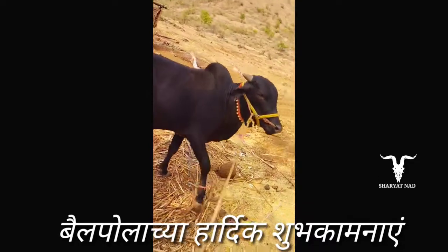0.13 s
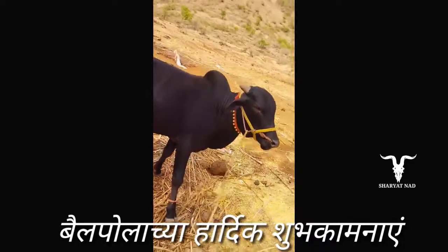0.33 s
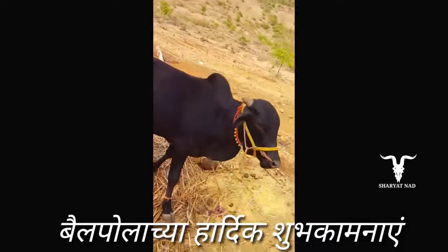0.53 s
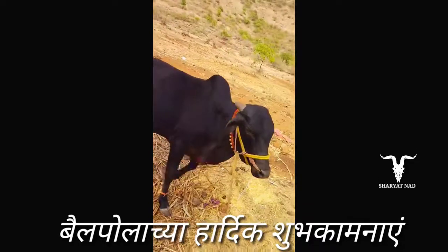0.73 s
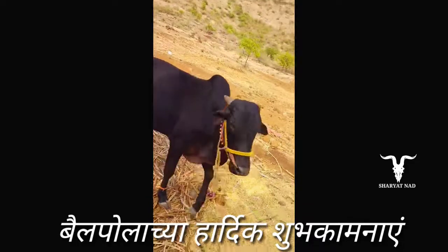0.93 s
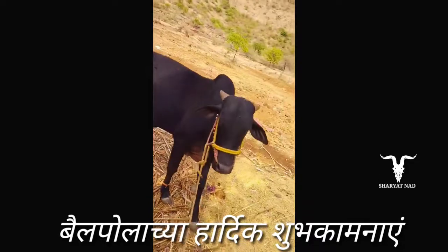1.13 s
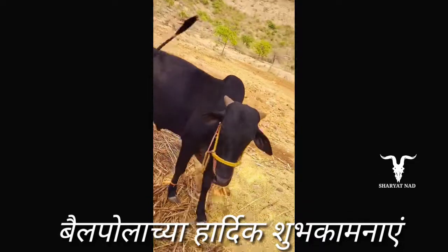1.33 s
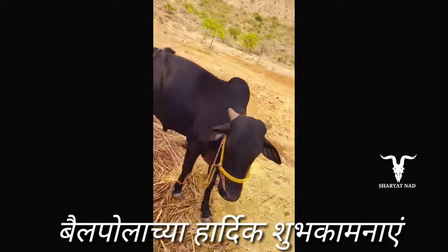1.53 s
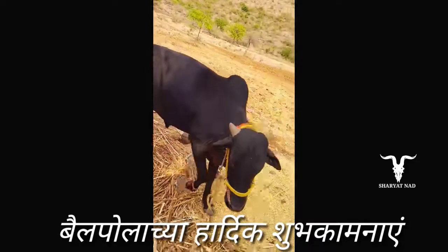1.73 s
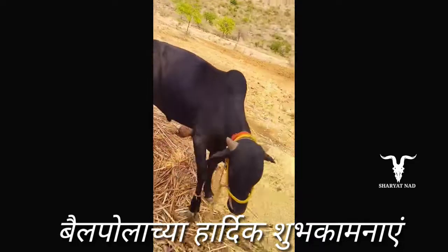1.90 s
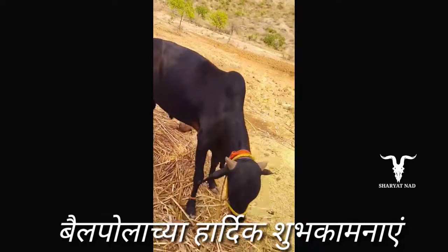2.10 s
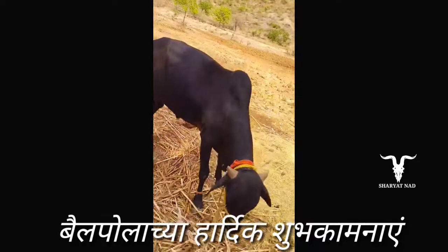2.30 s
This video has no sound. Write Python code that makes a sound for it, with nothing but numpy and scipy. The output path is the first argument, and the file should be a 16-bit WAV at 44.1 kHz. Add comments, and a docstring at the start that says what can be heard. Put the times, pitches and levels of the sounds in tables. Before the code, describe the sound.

Dry straw rustles, crunches and crackles close up as a bullock shifts its hooves outdoors, with sharp stalk snaps and faint gritty scuffs, while low wind puffs buffet the stereo microphone, mostly on the right.

```python
"""Bullock in dry straw, close by

A young bullock shifts its feet outdoors: stalks slide, crunch and crackle as shaped noise and tiny rings,
a few snap as short bursts with a ring, and hooves scuff the dry ground as swells of gritty noise.
A breeze buffets the two microphone ports, mostly the right, with soft low puffs made of random pushes
and single strong eddies; faint steady noise is the air of the yard."""
import sys
import numpy as np
from scipy import signal
from scipy.fft import rfft, irfft, next_fast_len
from scipy.io import wavfile
from scipy.ndimage import uniform_filter1d, map_coordinates

SR = 44100
rng = np.random.default_rng(int(sys.argv[2]) if len(sys.argv) > 2 else 0)


def transcribe(u):
    """Save the signal u as a 16-bit wav file named by the first command-line argument.

    u: samples, shape (n,) or (channels, n), limited to [-1, 1]; the rate is SR.
    q: integer samples, one column per channel.
    """
    v = np.clip(np.atleast_2d(u).T, -1, 1)
    q = np.round(v * 32767).astype(np.int16)
    wavfile.write(sys.argv[1], SR, q)


N = 108221


def amp(db):
    """Decibels to gain."""
    return 10 ** (np.asarray(db) / 20)


def unit(x):
    """Scale to rms 1, all channels together."""
    return x / np.sqrt(np.mean(x ** 2) + 1e-20)


def along(points, hz):
    """Read (Hz, value) points at any frequency, on a log axis."""
    f, v = np.transpose(points)
    return np.interp(np.log(hz + 1), np.log(f + 1), v)


def curves(rows):
    """One value per sample for each column after the time."""
    s, *cols = np.transpose(rows)
    return [np.interp(np.arange(N) / SR, s, c) for c in cols]


def wobble(rate):
    """A bounded random curve of straight lines between knots, rate knots a second."""
    knots = np.clip(rng.standard_normal(N // 20), -1.6, 1.6)
    return 1.26 * np.interp(np.arange(N) * rate / SR, np.arange(N // 20), knots)


def filtered(x, response):
    """Multiply the spectrum of x by a response of frequency."""
    m = next_fast_len(N + SR // 4)
    return irfft(rfft(x, m) * response(np.fft.rfftfreq(m, 1 / SR)), m)[..., :N]


def coloured(x, spectrum):
    """Shape x by the given spectrum and bring it to rms 1."""
    return unit(filtered(x, lambda hz: amp(along(spectrum, hz))))


def steadied(x, window_s):
    """Even out the level towards rms 1 over every short stretch."""
    power = uniform_filter1d(x ** 2, max(int(window_s * SR), 1))
    return x / np.sqrt(np.abs(power) + 0.034)


def add(track, s, sound):
    """Mix a sound into the track at time s in seconds."""
    part = track[..., max(round(s * SR), 0):][..., :sound.shape[-1]]
    part += sound[..., :part.shape[-1]]


def port_gains(pan_db):
    """Left and right gains of total power 1."""
    g = amp(np.array([pan_db / 2, -pan_db / 2]))
    return g / np.sqrt(np.sum(g ** 2, axis=0))


def impulses(rate, spread_db):
    """Randomly timed pushes of either sign and uneven size."""
    struck = rng.random(N) < rate / SR
    sign = rng.choice([-1, 1], N)
    return struck * sign * amp(spread_db * np.clip(rng.standard_normal(N), -2, 2))


def at_ports(pair):
    """Two unrelated versions of a straw or hoof sound become partly alike left and right signals."""
    # Each row: frequency in Hz, left minus right in dB
    lean = [(900, 1), (1800, 3), (3000, -0.5), (4200, 0.5), (6600, 5.5), (9000, -3.5), (12000, 1),
            (15000, 4.5)]
    # Each row: frequency in Hz, phase by which the left leads in radians
    port_phase = [(600, 4.5), (1200, -0.83), (1700, -0.6), (2600, -0.9), (3100, -5), (3800, -3.5),
                  (5200, -2.5), (6500, -4), (9000, -5.5), (15000, -4.5)]
    # Each row: frequency in Hz, left-right likeness (correlation)
    alike = [(800, 0.16), (5000, 0.27), (8000, 0.37), (15000, 0.3)]

    def mix(hz):
        turn = np.arccos(np.clip(along(alike, hz), -1, 1)) / 2
        return np.array([np.cos(turn), np.sin(turn)])

    half = np.array([[.5], [-.5]])  # each port takes half of the difference

    def place(hz):
        return amp(half * along(lean, hz)) * np.exp(1j * half * along(port_phase, hz))

    mid, side = filtered(pair, mix)
    return filtered(np.array([mid + side, mid - side]), place)


def patchy(x, depth_db, patch_hz=170, patch_s=.035):
    """Different stalks sound in turn, so the colour shifts in small patches of pitch and time."""
    z = signal.stft(x, nperseg=1024)[2]
    bins_hz, frames_s = np.linspace(0, SR / 2, z.shape[1]), np.linspace(0, N / SR, z.shape[2])
    hz, s = np.meshgrid(bins_hz, frames_s, indexing="ij")
    knots = rng.standard_normal((256, 256))
    field = map_coordinates(knots, [hz / patch_hz, s / patch_s], order=1, mode="wrap")
    return signal.istft(z * amp(depth_db * field), nperseg=1024)[1][:, :N]


def yard(level_db=-63):
    """The faint air of the open yard: steady noise, unrelated at the two ports."""
    air_tone = [(30, 1), (150, 7), (700, -55.0), (2000, -5.0), (15000, -9)]  # (Hz, relative dB)
    return amp(level_db) * coloured(rng.standard_normal((2, N)), air_tone)


def buffeting(level_db=-1.21, smooth_db=-6, flutter_db=3.0, edge_db=-9, edge_grows=0.54, brisk_db=-32):
    """Small eddies strike each port separately; the sound brightens when fast air covers both ports."""
    # Strength of the breeze at each port. Each row: time in seconds, level in dB before level_db
    breeze_left = [(0.0, -61), (0.2, -71), (0.36, -61), (0.41, -34.5), (0.5, -44), (0.65, -44),
                   (0.79, -38.5), (0.94, -50.5), (1.19, -39.5), (1.23, -48), (1.34, -27), (1.47, -33.5),
                   (1.55, -36), (1.62, -29), (1.72, -38.5), (1.79, -28.5), (1.86, -38.5), (1.96, -30.5),
                   (2.02, -33.5), (2.12, -35.5), (2.2, -30.5), (2.28, -30), (2.36, -37.5), (2.45, -28)]
    breeze_right = [(0.0, -25.5), (0.07, -33), (0.18, -43), (0.29, -37), (0.35, -29.5), (0.49, -26.5),
                    (0.59, -36), (0.68, -28.5), (0.81, -30), (0.92, -42), (0.97, -33), (1.13, -35.5),
                    (1.21, -38), (1.29, -32), (1.32, -28), (1.41, -25.5), (1.5, -31.5), (1.55, -26),
                    (1.62, -34.5), (1.7, -25), (1.81, -35), (1.882, -21.5), (1.96, -31), (2.07, -33.5),
                    (2.15, -25.5), (2.21, -39.5), (2.3, -32), (2.45, -30)]
    # Colour of the low puffs. Each row: frequency in Hz, relative level in dB per Hz
    puff_tone = [(20, -63), (40, -44), (60, -15), (95, 3.5), (150, 4), (240, 3.5), (340, -11.5), (450, -29),
                 (600, -35), (800, -84)]
    # Colour added by fast air. Each row: frequency in Hz, relative level in dB per Hz
    edge_tone = [(150, -28), (300, 2.5), (420, 0), (540, -8), (660, -16.5), (800, -23.5), (1100, -52)]
    eddies_per_s, edge_flicker_db = 330, 3.5
    levels = [curves(breeze)[0] for breeze in (breeze_left, breeze_right)]
    bright_db = edge_db + edge_grows * (np.mean(levels, axis=0) - brisk_db)
    ports = []
    for breeze_db in levels:
        push = unit(impulses(eddies_per_s, spread_db=1.1)) + amp(smooth_db) * rng.standard_normal(N)
        push = push * amp(flutter_db * wobble(60))
        edge = amp(bright_db + edge_flicker_db * wobble(70)) * coloured(push, edge_tone)
        puffs = steadied(coloured(push, puff_tone), window_s=0.0438)
        ports.append(amp(breeze_db + level_db) * (puffs + edge))
    return np.array(ports)


def eddies(level_db=-3.1, width_cycles=0.53):
    """A strong eddy at the ports is one soft push and pull of about a cycle."""
    # Each row: centre in seconds, level in dB before level_db, pitch in Hz, left minus right in dB
    strong_eddies = [(0.032, -16.5, 184, -23), (0.06, -14.5, 180, -28), (0.227, -21.5, 270, -28),
                     (0.326, -16.5, 290, -29), (0.372, -20, 270, -27), (0.392, -19.5, 328, -28),
                     (0.41, -20, 260, -22), (0.441, -14, 310, -27), (0.453, -17, 267, -24),
                     (0.479, -7, 284, -31), (0.485, -14, 348, -27), (0.491, -16.5, 230, -27),
                     (0.499, -13, 166, -18), (0.537, -14, 360, -30), (0.549, -12.5, 188, -22),
                     (0.554, -18.5, 174, -10), (0.722, -17.5, 253, -33), (0.774, -12.5, 330, -24),
                     (0.785, -21, 296, -15), (0.817, -14, 224, -23), (1.034, -16, 286, -17),
                     (1.095, -19.5, 230, -37), (1.153, -22, 273, -25), (1.243, -17, 352, -29),
                     (1.318, -9, 275, -23), (1.342, -18, 181, -12), (1.366, -29, 222, -7),
                     (1.398, -13, 270, -18), (1.411, -8, 350, -35), (1.424, -15.5, 231, -24),
                     (1.436, -12, 300, -31), (1.445, -16.5, 262, -23), (1.476, -11.5, 226, 5),
                     (1.564, -12.5, 300, -33), (1.666, -16.5, 323, -16), (1.679, -13.5, 262, -24),
                     (1.695, -19, 333, -26), (1.712, -14, 330, -17), (1.723, -12.5, 283, -15),
                     (1.733, -14.5, 318, -23), (1.841, -16, 218, -27), (1.887, -9.5, 316, -26),
                     (1.91, -13, 318, -25), (1.925, -18.5, 271, -23), (1.953, -11.5, 215, 21),
                     (2.011, -12, 337, -29), (2.083, -15.5, 186, -34), (2.148, -10.5, 268, -31),
                     (2.159, -16.5, 203, -28), (2.267, -15.5, 145, 15), (2.279, -15.5, 232, 9),
                     (2.423, -15.5, 240, 16)]
    out, t = np.zeros((2, N)), np.arange(SR // 20) / SR
    for s, db, hz, pan_db in strong_eddies:
        cycles = (t - t.mean()) * hz
        push = np.exp(-(cycles / width_cycles) ** 2) * np.sin(-2 * np.pi * cycles)
        add(out, s - t.mean(), amp(db + level_db) * port_gains(pan_db)[:, None] * push)
    return out


def scuffs():
    """A hoof drags over the ground: a dull swish that swells and fades, each at its own pitch."""
    # Each row: peak in seconds, spread (standard deviation) in seconds, level in dB, pitch in Hz
    hoof_scuffs = [(0.183, 0.081, -52.5, 1120), (0.928, 0.049, -51, 1110), (1.204, 0.0048, -47.5, 1190),
                   (1.713, 0.043, -52.5, 890), (1.938, 0.015, -45.5, 2100), (2.074, 0.015, -49, 895),
                   (2.137, 0.0057, -50, 950)]
    # Colour of a scuff. Each row: multiple of its pitch, relative level in dB per Hz
    scuff_tone = [(.4, -22), (.74, -6), (.92, 2.5), (1.17, 0.5), (1.4, -4), (1.73, -17), (2.5, -32),
                  (5, -40)]
    t, out = np.arange(N) / SR, np.zeros((2, N))
    grit = rng.standard_normal((2, N)) * amp(2.0 * wobble(300))
    for s, spread_s, db, hz in hoof_scuffs:
        swell = amp(db) * np.exp(-((t - s) / spread_s) ** 2 / 2)
        out += swell * coloured(grit, [(k * hz, level) for k, level in scuff_tone])
    return out


def crackle(per_s=700, middle_hz=5040, life_cycles=0.62):
    """Countless tiny stalk fractures, each a ring that dies within about a cycle."""
    t = np.arange(128) / SR
    when, pitch, size, *phases = rng.random((int(per_s * N / SR), 5)).T[:, :, None]
    cycles = t * middle_hz * 2 ** (2.6 * (pitch - .5))
    life = amp(-4 * np.log(size + 0.029)) * np.exp(-2 * cycles / life_cycles)
    where = ((when * N).astype(int) + np.arange(len(t))).ravel()
    ports = []
    for phase in phases:  # the same fractures at both ports, with unrelated phases
        rings = life * np.sin(2 * np.pi * (cycles + phase))
        ports.append(np.bincount(where, rings.ravel(), N)[:N])
    return unit(np.array(ports))


def ticks(rate=100, spread_db=4, tick_t60=0.0046):
    """Brittle stalks click at random times, each with a short dry burst of noise."""
    # Colour of brittle stalks. Each row: frequency in Hz, relative level in dB per Hz
    tick_tone = [(900, -4), (1800, 3), (3000, 1.5), (7000, 1.5), (10000, -6), (15500, -12)]
    t = np.arange(SR // 100) / SR
    out, count = np.zeros((2, N)), int(rate * N / SR)
    for place, size in rng.random((count, 2)):
        fade_db = -spread_db * np.log(size + 0.054) - 60 * t / tick_t60
        add(out, place * N / SR, amp(fade_db) * rng.standard_normal((2, len(t))))
    return coloured(out, tick_tone)


def rustle(hiss_db=-2.0, crunch_db=-1.3, crackle_db=-10.5, tick_db=-6, grain_db=0.5):
    """Stalks slide, crunch and crackle as the hooves drag through them."""
    # The moving straw. Each row: time in seconds, level of the sliding in dB, level of the crunch in dB,
    # both before the trims above
    straw = [(0.0, -56, -50.5), (0.06, -53.5, -56), (0.18, -41.5, -45), (0.29, -50, -53),
             (0.34, -56.5, -64), (0.38, -54.5, -60), (0.38, -46, -50), (0.43, -35, -48.5),
             (0.48, -47.5, -52), (0.595, -41, -47), (0.68, -48.5, -52.5), (0.77, -47, -52),
             (0.78, -52, -56.5), (0.89, -45.5, -50), (0.97, -48, -53), (1.08, -48.5, -50),
             (1.14, -52, -53.5), (1.28, -42.5, -50), (1.34, -50, -51.5), (1.41, -43, -46), (1.57, -54, -58),
             (1.61, -47, -57.5), (1.69, -48.5, -48.5), (1.71, -55.5, -58), (1.76, -47.5, -52),
             (1.84, -53.5, -54), (1.9, -64, -64), (1.94, -46.5, -51.5), (2.01, -60.5, -57.5),
             (2.07, -48, -45.5), (2.09, -50, -54), (2.14, -41, -44.5), (2.17, -48, -54.5),
             (2.26, -45.5, -47), (2.28, -49.5, -55), (2.38, -52, -53.5), (2.45, -60, -59.5)]
    # Colours of sliding and of pressed stalks. Each row: frequency in Hz, relative level in dB per Hz
    hiss_tone = [(1500, -42), (2600, -38), (3400, -1.5), (4500, -3), (6800, -3), (9000, -6), (11500, -11.5),
                 (15500, -17)]
    crunch_tone = [(300, -37), (700, -10), (1000, -3.5), (1400, -1), (1800, 0), (2300, 0.5), (2850, 1),
                   (3150, -6), (6000, -35)]
    slide_db, press_db = curves(straw)
    catch = patchy(rng.standard_normal((2, N)), depth_db=5.0) * amp(grain_db * wobble(600))
    crunch = amp(press_db + crunch_db) * coloured(catch * amp(1.2 * wobble(70)), crunch_tone)
    slide = patchy(rng.standard_normal((2, N)), depth_db=3.5, patch_hz=257.6)
    slide = slide * amp(grain_db * wobble(600) + 2.02 * wobble(70.71))
    hiss = coloured(slide, hiss_tone)
    sliding = amp(hiss_db) * hiss + amp(crackle_db) * crackle() + amp(tick_db) * ticks()
    return crunch + amp(slide_db) * sliding


def snaps(ring_db=-7.5, crack_db=1, crack_q=0.72, splinter_db=-25, splinter_t60=0.11, attack_s=.0001):
    """A stalk breaks: a noise crack around its own pitch, a very short ring, a faint splintering tail."""
    # Each row: start in seconds, level in dB before the trims above, pitch in Hz, t60 in seconds
    breaks = [(.1366, -33, 2030, 0.0081), (0.382, -37, 2250, 0.013), (0.4249, -25, 5380, 0.012),
              (0.445, -37, 5900, .007), (0.616, -36, 4500, 0.0075), (0.7668, -32.5, 6780, 0.013),
              (0.8218, -13.5, 2440, 0.0044), (0.9287, -18.5, 1400, 0.0058), (0.9294, -21.5, 2780, 0.014),
              (0.936, -29, 2960, 0.0082), (1, -34, 4430, 0.0067), (1.0368, -24, 7250, 0.0053),
              (1.2023, -22, 4360, 0.0055), (1.2042, -22, 3020, 0.0058), (1.2436, -27, 4600, 0.0096),
              (1.3962, -29.5, 7330, 0.015), (1.409, -29, 6000, .007), (1.4369, -21.5, 5340, 0.0075),
              (1.446, -21.5, 1530, 0.005), (1.546, -33, 6950, 0.015), (1.6051, -32, 6000, 0.007),
              (1.6487, -27, 3100, 0.0057), (1.661, -38, 2600, 0.0092), (2.2583, -25, 6650, 0.0073),
              (2.2927, -31.5, 2180, 0.01), (2.339, -27, 8750, 0.0033), (2.384, -32.5, 4840, 0.0099)]
    # Treble fall of splitting fibres. Each row: frequency in Hz, gain in dB
    crack_top = [(6000, -0.5), (10000, -6), (15500, -15)]
    rings, cracks, t = np.zeros(N), np.zeros((2, N)), np.arange(SR // 16) / SR
    f = np.fft.rfftfreq(len(t), 1 / SR)
    for s, db, hz, t60 in breaks:
        fade = amp(-60 * t / t60) * (1 - np.exp(-t / attack_s))
        add(rings, s, amp(db + ring_db) * fade * np.sin(2 * np.pi * hz * t))
        splinters = amp(splinter_db - 60 * t / splinter_t60)
        burst = (amp(crack_db) * fade + splinters) * rng.standard_normal((2, len(t)))
        stalk = 1j * f * hz / (crack_q * (hz ** 2 - f ** 2) + 1j * f * hz)  # band-pass at the pitch
        add(cracks, s, amp(db) * irfft(rfft(burst) * stalk * amp(along(crack_top, f)), len(t)))
    return rings + at_ports(cracks)


def scene():
    """Wind on the microphone, straw and hooves in front of it."""
    air = yard() + buffeting() + eddies()
    return air + at_ports(scuffs() + rustle()) + snaps()


def record(dry):
    """The recorder keeps nothing above its band limit."""
    top_hz = 15800
    return filtered(dry, lambda hz: hz < top_hz)


dry = scene()
out = record(dry)
transcribe(out)
```